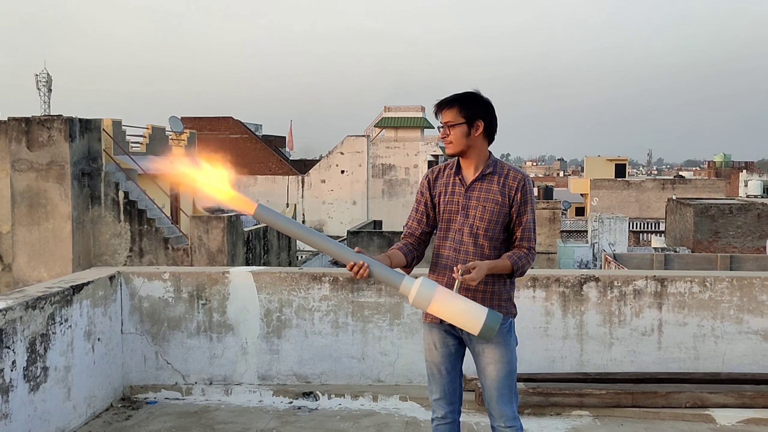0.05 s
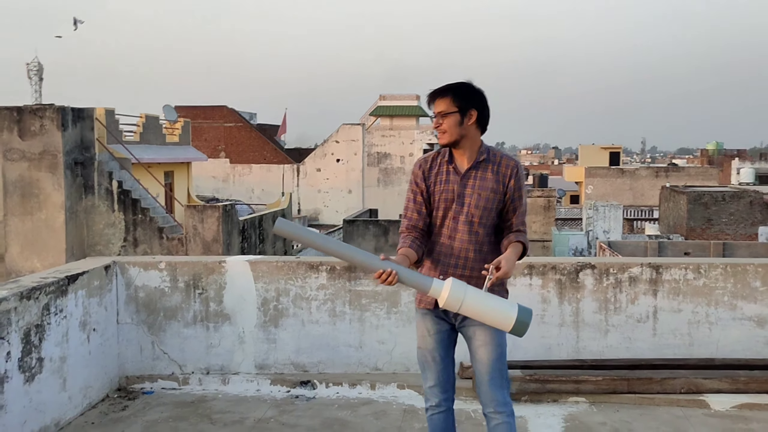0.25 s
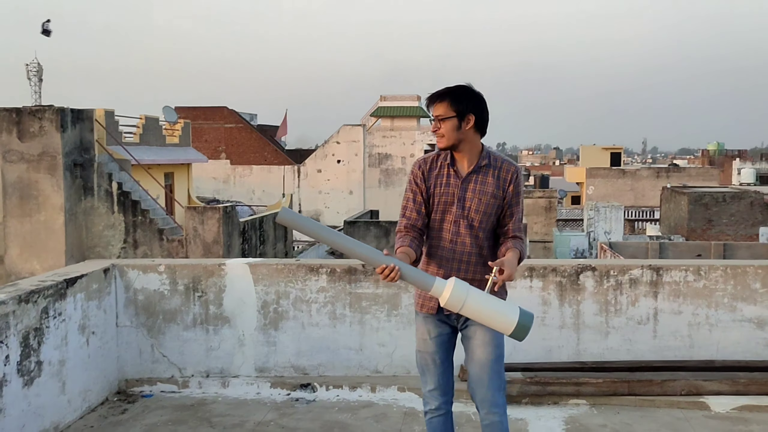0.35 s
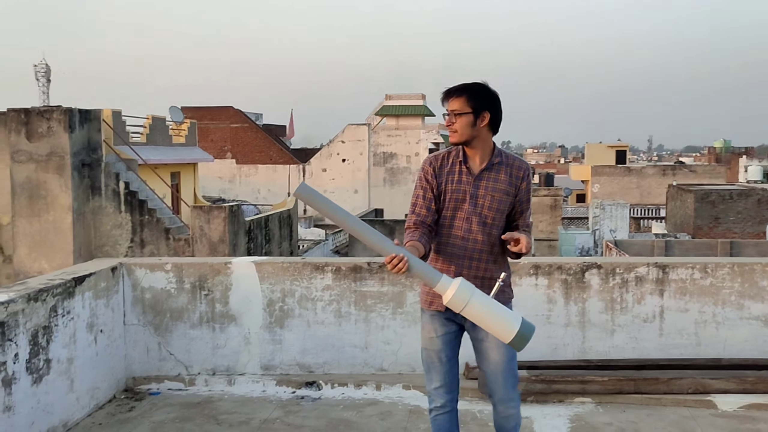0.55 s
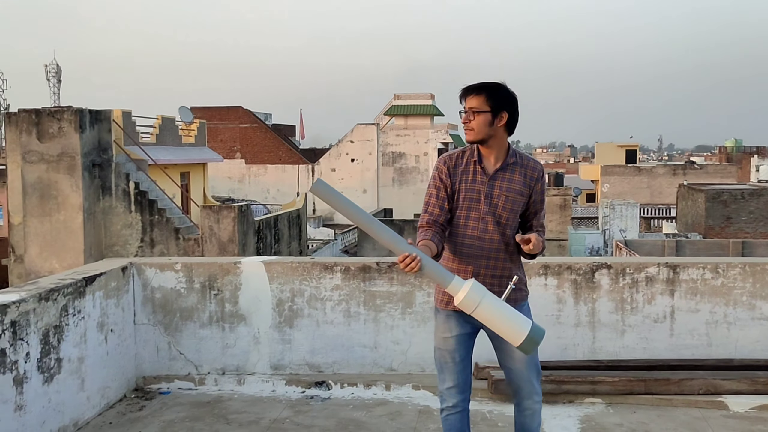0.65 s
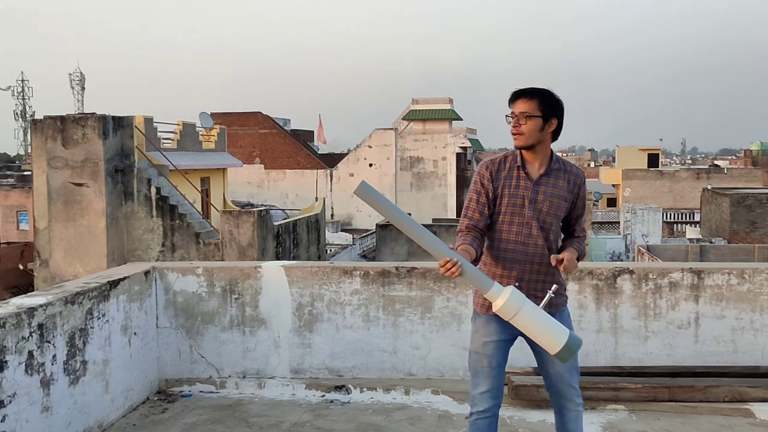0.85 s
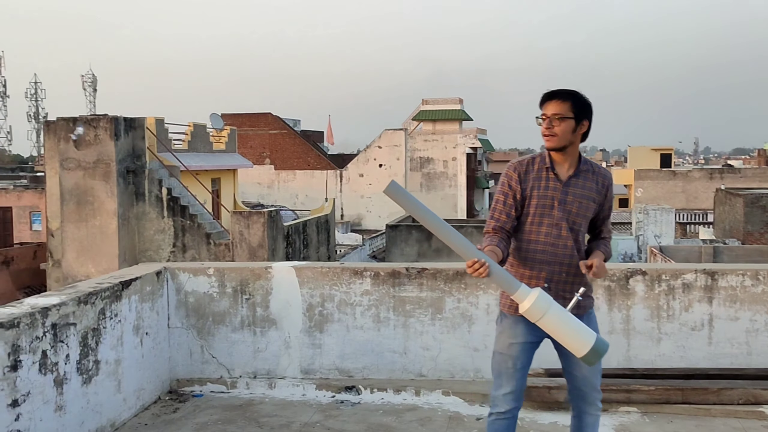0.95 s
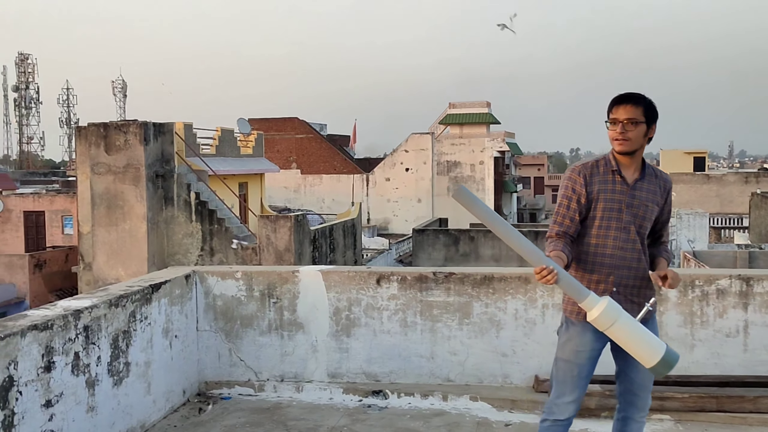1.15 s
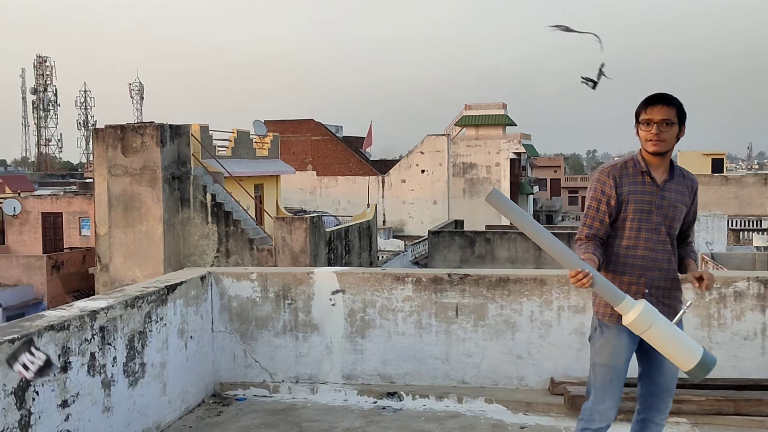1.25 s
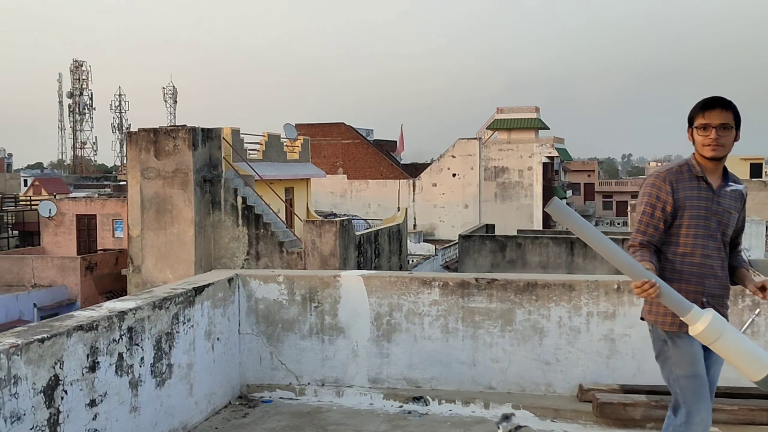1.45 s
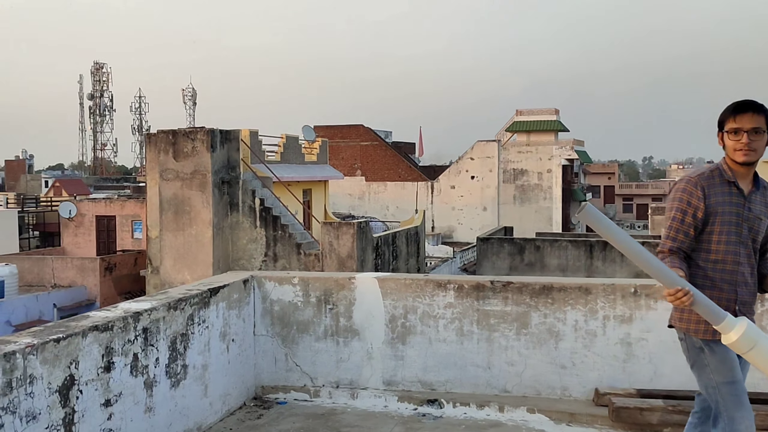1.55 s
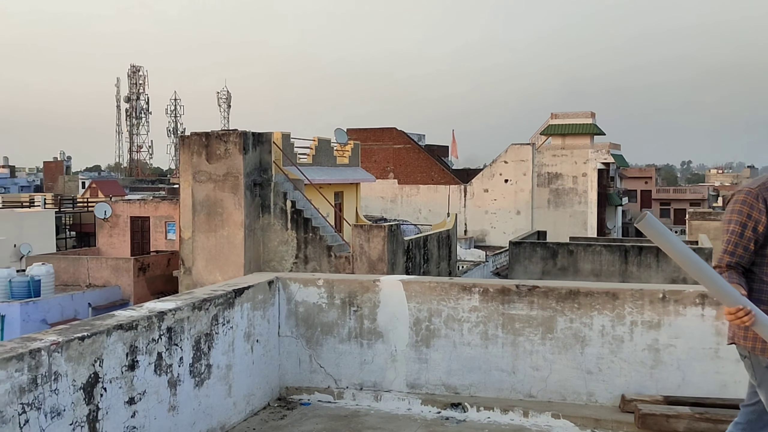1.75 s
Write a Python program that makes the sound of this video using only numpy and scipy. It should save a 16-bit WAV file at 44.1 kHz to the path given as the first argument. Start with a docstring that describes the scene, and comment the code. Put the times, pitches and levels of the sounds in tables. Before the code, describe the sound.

A pipe cannon fires one loud bang outdoors, followed by echoes and light clatters.

```python
"""A homemade pipe cannon fires on a rooftop: an igniter tick, a harsh gas blast that overloads the
microphone, then the hollow boom of air ringing in the barrel. Nearby walls slap the shot back, and
reflections from roofs and far houses let it die away. Bits of the wad clatter down over a faint
town rumble, and a thin, far, wavering whine fades in near the end."""
import sys
import numpy as np
from scipy import signal
from scipy.fft import rfft, irfft
from scipy.io import wavfile
from scipy.ndimage import uniform_filter1d

SR = 44100
rng = np.random.default_rng(int(sys.argv[2]) if len(sys.argv) > 2 else 0)


def output_pcm(signal):
    """Save a mono or channel-first signal as 16-bit PCM at the path in sys.argv[1].

    Samples are clipped to [-1, 1] before scaling.
    """
    pcm = np.clip(np.atleast_2d(signal).T, -1, 1) * 32767
    wavfile.write(sys.argv[1], SR, np.round(pcm).astype(np.int16))


N = 79380
T = np.arange(N) / SR
FIRE_S, CRACK_RISE_S = 0.2383, 0.0007
TOP_HZ = 8100  # the recorder's bandwidth
LN_1000 = np.log(1000)  # time constants in a 60 dB decay (t60)


def undb(db):
    """Decibels to gain."""
    return 10 ** (np.asarray(db) / 20)


def unit(x):
    """Scale to rms 1."""
    return x / np.sqrt(np.mean(x ** 2))


def lookup(table, hz):
    """Read a table on a log-frequency axis."""
    points = np.array(table)
    return np.interp(np.log(hz + 1), np.log(points[:, 0]), points[:, 1])


def filtered(x, gain):
    """EQ with a gain that is a function of frequency."""
    hz = np.arange(N + 1) * SR / (2 * N)
    return irfft(rfft(x, 2 * N) * gain(hz))[..., :N]


def wander(per_s):
    """Smooth random modulation of rms 1, with per_s changes a second."""
    step = int(SR / per_s)
    stairs = np.repeat(rng.standard_normal(N // step + 1), step)
    return unit(uniform_filter1d(uniform_filter1d(stairs, step), step)[:N])


def envelope(start, rise, hold, decay):
    """Linear attack, then exponential release from start + hold; all in seconds."""
    return np.clip((T - start) / rise, 0, 1) * np.exp(-np.maximum(T - start - hold, 0) / decay)


def pan(db):
    """Stereo gains with the left db above the right."""
    return undb(np.array([[db], [-db]]) / 2)


def diffuse(spectrum):
    """Coloured noise of rms 1 from all around: narrow in the bass, wide in the treble."""
    mid, side = rng.standard_normal((2, N))
    bass_width, wide_above_hz = 0.27, 627
    width = lambda hz: np.clip(np.hypot(bass_width, (hz / wide_above_hz) ** 2), 0, 1)
    colour = lambda hz: undb(lookup(spectrum, hz)) * (hz < TOP_HZ) / np.hypot(1, width(hz))
    pair = mid + filtered(side, width) * np.array([[1], [-1]])
    return unit(filtered(pair, colour))


def town_rumble():
    """The town lays a low, gently wavering bed under the scene."""
    # rumble spectrum: f/Hz, relative level/dB
    spectrum = [(20, -5), (60, 1.5), (120, -3.5), (250, -7), (450, -9), (800, -15.5), (1500, -19.5),
                (2600, -18.5), (4500, -21), (6600, -18), (7700, -22.5)]
    return diffuse(spectrum) * undb(-57 - 0.8 * wander(per_s=5))


def blast():
    """The igniter ticks, then burning gas tears out of the barrel."""
    # spectrum of tick and gas: f/Hz, relative level/dB
    spectrum = [(20, -13.5), (45, -2.5), (300, -1.5), (800, -5), (1500, -3.5), (3000, -7), (5000, -5),
                (6600, 1.5), (7700, 3)]
    tick = undb(-32) * envelope(start=0.228, rise=CRACK_RISE_S, hold=0, decay=0.0042)
    gas = undb(-6) * envelope(FIRE_S, CRACK_RISE_S, hold=0.042, decay=0.019)
    return (tick + gas) * diffuse(spectrum) * pan(-1.3)


def roof_reverb():
    """Countless grainy reflections off roofs; each octave dies at its own rate over a long faint roll."""
    # reverb spectrum: f/Hz, relative level/dB
    spectrum = [(20, -3), (45, -6.5), (110, 5.5), (250, -6.5), (420, -4), (850, -1.5), (1400, -13),
                (2400, -14), (4200, -12), (6400, -4.5), (7700, -11.5)]
    # decay of the main tail: f/Hz, t60/s
    decay_times = [(40, 0.76), (120, 0.74), (450, 0.89), (1000, 0.93), (2200, 1.517), (4500, 0.88),
                   (7000, 0.93)]
    bloom_s, roll_t60_s = 0.043, 2.13
    scatter = unit(diffuse(spectrum) * undb(wander(per_s=500)))  # 1 dB of grain
    roll = undb(-32) * envelope(FIRE_S, bloom_s, bloom_s, roll_t60_s / LN_1000)
    out = 0
    for octave in range(5, 14):  # 32 to 8192 Hz
        band = filtered(scatter, lambda hz: np.maximum(1 - abs(np.log2(hz + 1) - octave), 0))
        t60 = lookup(decay_times, 2.0 ** octave)
        tail = undb(-11) * envelope(FIRE_S, bloom_s, bloom_s, t60 / LN_1000)
        flutter = undb(1.5 * wander(per_s=30))
        out = out + band * np.hypot(tail, roll) * flutter
    return out * pan(1.7)


def barrel_boom():
    """The air in the emptied barrel rings at its own modes: a deep thump, then a hollow honk."""
    # air modes of the barrel: f/Hz, level/dB, onset delay/s, t60/s
    modes = [(110.7, -6, 0.00079, 0.034), (172, -17, 0.0082, 0.17), (217.3, -21, 0.00079, 0.24),
             (243.8, -20.5, 0, 0.15), (365.2, -14.5, 0.00098, 0.15), (398, -13.5, .025, 0.035),
             (551.6, -25, 0, 0.11), (786, -27, 0.0038, .18), (1001.3, -18.5, .005, 0.13)]
    boom_s = 0.2855
    out = 0
    for hz, db, delay, t60 in modes:
        start = boom_s + delay
        tone = np.sin(2 * np.pi * hz * (T - start))
        out = out + undb(db) * tone * envelope(start, rise=0.0016, hold=0.017, decay=t60 / LN_1000)
    return out * pan(-3)


def echoes():
    """The shot returns as sharp slaps from near walls and soft swells from far houses."""
    # wall slaps: t/s, level/dB, decay/s, left minus right/dB
    slaps = [(0.3377, -11, 0.0065, 1), (0.3546, -11, 0.0086, 1), (0.3638, -18, 0.0033, 0),
             (0.3837, -11.5, 0.01, 1), (0.4039, -13.5, 0.0052, -1), (0.4375, -18, 0.018, -0.5),
             (0.525, -21.5, 0.0016, -17)]
    # smeared echoes from far houses: t/s, level/dB, half-width/s
    swells = [(0.631, -40.5, 0.038), (0.774, -40.5, 0.044), (0.875, -41.5, 0.027)]
    # echo spectrum: f/Hz, relative level/dB
    spectrum = [(30, 7.5), (150, -6), (420, 3.5), (900, -1.5), (1500, -3.5), (3500, -5), (5300, -8.5),
                (6600, -1), (7700, 0)]
    near = sum(undb(db) * pan(side_db) * envelope(start, CRACK_RISE_S, decay / 2, decay)
               for start, db, decay, side_db in slaps)
    far = sum(undb(db) * np.exp(-((T - peak) / width) ** 2) for peak, db, width in swells)
    return (near + far) * diffuse(spectrum)


def debris():
    """Each falling bit of wad cracks, rings briefly and rebounds at once; the roof adds a short haze."""
    # landings: t/s, level over span_s/dB, low cut/Hz, high cut/Hz, left minus right/dB
    landings = [(0.668, -40.5, 3400, 7420, -4), (.685, -21, 1800, 7360, 5),
                (.6975, -37.5, 3050, 7460, -2.5), (0.7358, -21.5, 380, 6770, 4.5),
                (0.7593, -42, 2530, 7000, 4), (0.7637, -36.5, 1500, 7000, 15),
                (0.8748, -42, 1200, 6900, 13), (0.951, -48.5, 1480, 5000, 4),
                (0.971, -47.5, 2500, 7500, 2.5), (1.022, -53, 1980, 6500, 7),
                (1.0887, -46.5, 1500, 3230, 2), (1.1225, -56, 2500, 7000, 9.5),
                (1.2243, -60, 1816, 7000, 4.5), (1.3181, -51, 400, 3370, 13),
                (1.387, -58.5, 1208, 4960, 7.5), (1.4374, -56, 1100, 3000, 11)]
    # modes of a bit: f/Hz, level relative to the crack/dB, t60/s
    modes = [(480, -16.5, 0.014), (870, -15.5, 0.02), (2252, -16.5, 0.0091), (3030, -16.5, 0.01),
             (4250, -14, .009), (5660, -14, 0.016), (7100, -14.5, 0.014)]
    crack_decay_s, haze_decay_s = 0.0008, 0.011
    rebound_s, left_lag_s, span_s = 0.0013, 0.00047, 0.01
    age = np.arange(SR // 8) / SR
    snap = np.exp(-age / crack_decay_s)
    rebound = undb(-7) * np.interp(age - rebound_s, age, snap, left=0)
    haze = undb(-29) * np.exp(-age / haze_decay_s)
    out = 0
    for start, db, low_hz, high_hz, side_db in landings:
        noise = rng.standard_normal((4, len(age)))
        hit = snap * noise[0] + rebound * noise[1]
        detune = 1 + 0.055 * rng.standard_normal(len(modes))
        for (hz, mode_db, t60), stretch in zip(modes, detune):
            hit += undb(mode_db) * np.sin(2 * np.pi * hz * stretch * age) * np.exp(-LN_1000 * age / t60)
        left = np.interp(age - left_lag_s, age, hit, left=0)
        pair = np.array([left, hit]) * pan(side_db) + haze * noise[2:]
        bandpass = signal.butter(2, [low_hz, high_hz], "band", fs=SR, output="sos")
        pair = signal.sosfilt(bandpass, pair)
        pair /= np.sqrt(np.sum(pair ** 2) / (2 * span_s * SR))
        out = out + undb(db) * np.pad(pair, ((0, 0), (int(start * SR), N)))[:, :N]
    return out


def far_whine():
    """A thin, distant tone fades in, wobbling in pitch and fluttering in level."""
    start_s, rise_s = 1.0, 0.29
    pitch_hz = 3010 + 12.8 * wander(per_s=25.05)
    level_db = -69.5 + 4.5 * wander(per_s=63)
    fade_in = np.clip((T - start_s) / rise_s, 0, 1)
    return fade_in * undb(level_db) * np.sin(2 * np.pi * np.cumsum(pitch_hz) / SR)


def scene():
    """The shot, its echoes and the falling bits over the town."""
    shot = blast() + barrel_boom() + echoes() + roof_reverb()
    return shot + debris() + far_whine() + town_rumble()


def record(dry):
    """The microphone saturates and the recorder cuts the top; the peaks then clip into a faint sizzle."""
    ceiling, clip_level = 0.8, 0.68
    edge_hz, sizzle_top_hz = 550, 15500
    saturated = ceiling * np.tanh(dry / ceiling)
    dulled = filtered(saturated, lambda hz: np.clip((TOP_HZ - hz) / edge_hz, 0, 1) ** 2)
    clipped = np.clip(dulled, -clip_level, clip_level)
    return filtered(clipped, lambda hz: np.clip((sizzle_top_hz - hz) / edge_hz, 0, 1))


dry = scene()
out = record(dry)
output_pcm(out)
```